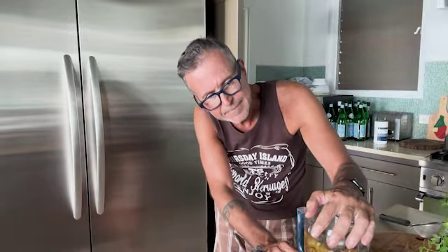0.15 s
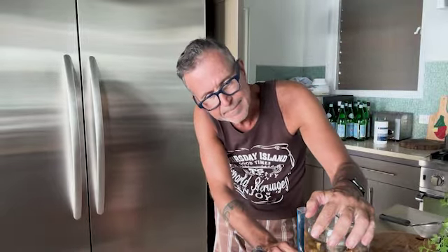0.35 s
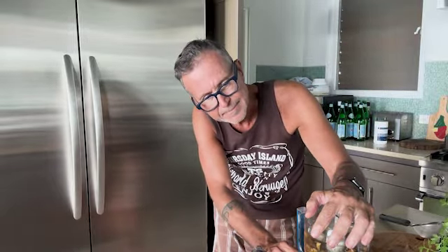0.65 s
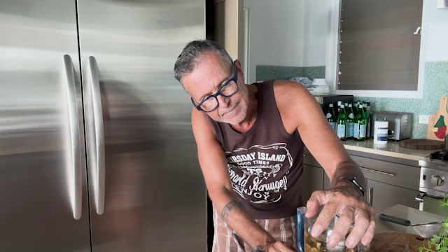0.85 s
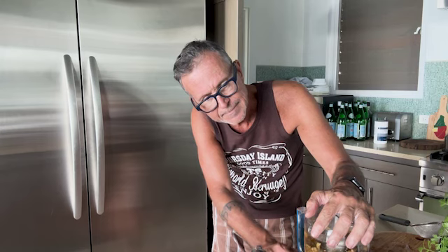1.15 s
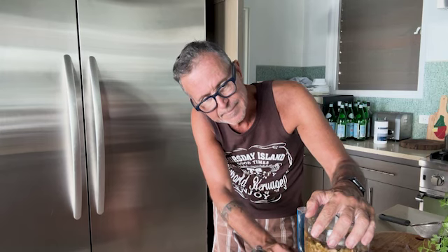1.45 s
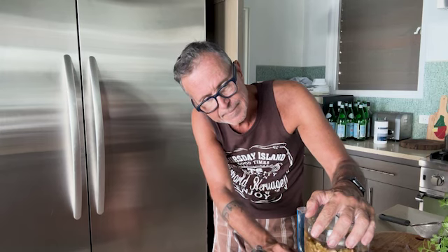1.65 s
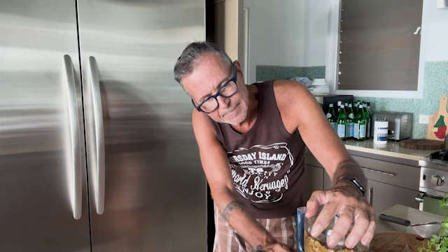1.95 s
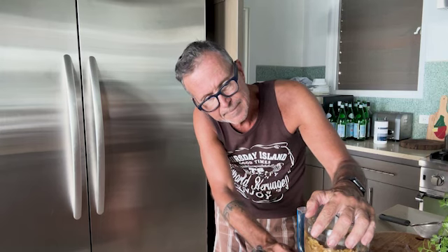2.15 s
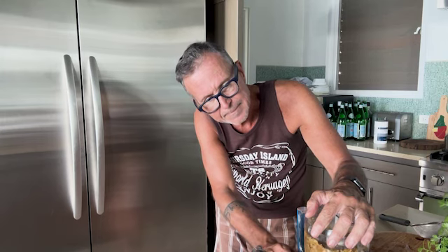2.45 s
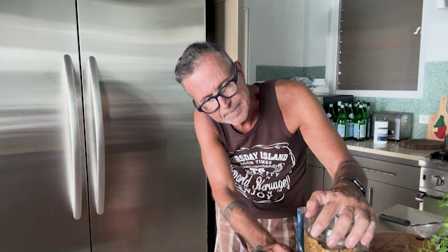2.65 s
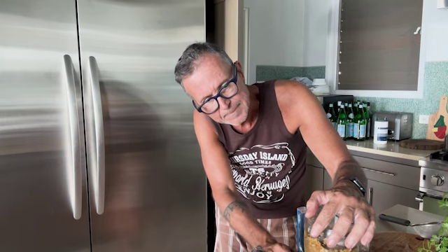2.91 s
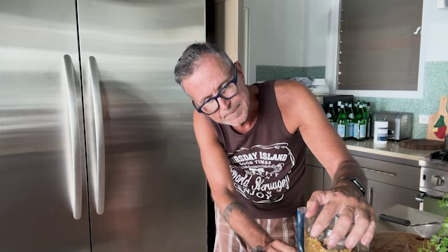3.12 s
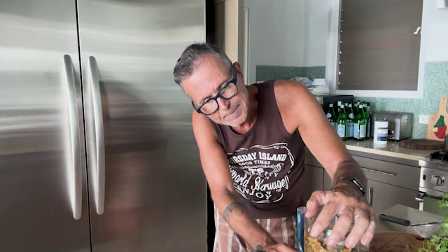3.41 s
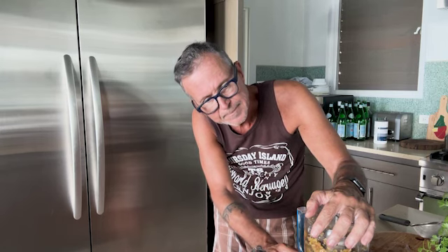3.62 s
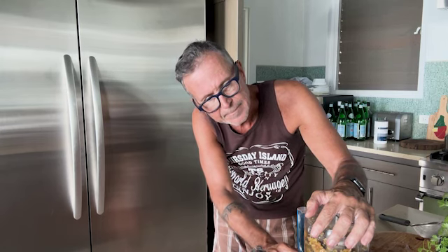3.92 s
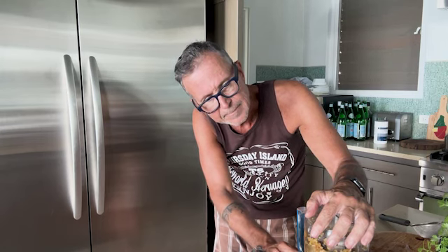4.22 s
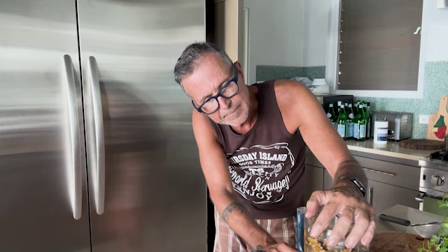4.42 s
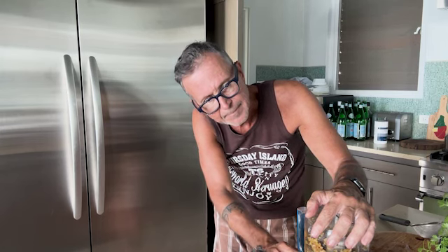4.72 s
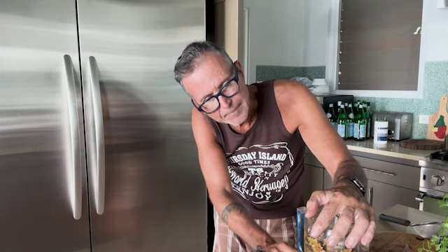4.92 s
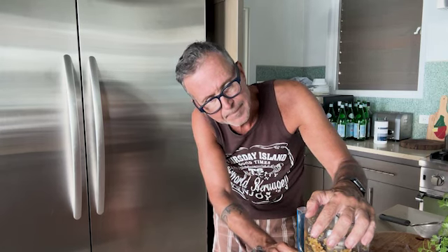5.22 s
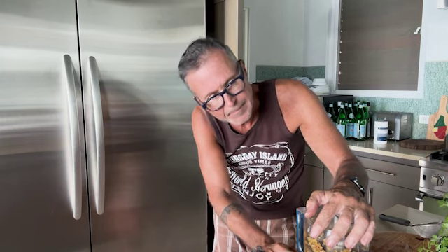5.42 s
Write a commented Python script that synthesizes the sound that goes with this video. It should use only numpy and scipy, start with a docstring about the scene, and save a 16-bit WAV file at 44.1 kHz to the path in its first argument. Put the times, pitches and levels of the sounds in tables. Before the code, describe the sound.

Short pulses of a chopper motor, an arm's length away: abrupt buzzing spin-up, gritty whine, bits of food ticking on the bowl, counter rumble on many bursts, then a quick downward slide. The bursts are crowded at first, fast and short in the middle, sparse near the end. Hard surfaces give a brief bright echo in stereo, and a refrigerator hums softly with airy hiss underneath.

```python
"""Food processor pulsed on a kitchen counter

A small food processor is pulsed in short bursts, an arm's length from a phone, with clicks of its button.
Its motor spins up under the button and coasts down. Motor speed sets the pitch of a gear whine and the
levels of noise for drive rattle, bearing squeal and counter rumble; random ticks are food on the bowl.
Shifting filtered echoes make the hard kitchen; sine hum and a hiss of air make the refrigerator.
"""
import sys
import numpy as np
from scipy import signal
from scipy.fft import rfft, irfft, next_fast_len
from scipy.io import wavfile
from scipy.ndimage import uniform_filter1d

SR = 44100
rng = np.random.default_rng(int(sys.argv[2]) if len(sys.argv) > 2 else 0)


def file_out(sig):
    """Save sig as 16-bit WAV at sys.argv[1]."""
    # one column per channel
    cols = np.atleast_2d(sig).T
    # limit, then scale
    lim = np.clip(cols, -1, 1)
    pcm = np.round(lim * 32767).astype(np.int16)
    wavfile.write(sys.argv[1], SR, pcm)


N = 245276
T = np.arange(N) / SR
SIZE = next_fast_len(N + SR)  # room for a one-second echo tail
HZ = np.fft.rfftfreq(SIZE, 1 / SR)

FULL_HZ, SPIN_UP_S = 2573, .075  # usual top mesh rate, time constant of the spin-up
KICK, KICK_HZ = 1.83, 1007.3  # extra torque near standstill, gone at this mesh rate
DRAG_HZ_PER_S, COAST_S, CRAWL_HZ = 4200, .27, 252  # friction, viscous braking; friction eases below the crawl
# Presses of the pulse button. Each row: pressed in seconds, released in seconds, mesh rate it runs toward
# in Hz, then offsets in dB over the speed law for rattle, whine, squeal, rumble, ring, upper whine partials.
PRESSES = [(-.073, 0.053, 2570, 0, 7, -1, 1.5, 6, 0.5), (0.099, 0.297, 2552, 0, 5, -1.5, 3.5, 4, -1),
           (0.351, 0.529, 2550, 0, 0.5, -1.5, 1.5, 6.5, 0), (0.63, 0.75, 2543, 0, 3, -1, 0.5, 3.5, 0.5),
           (1.155, 1.381, 2541, 1.5, 3, -1.5, 2, -14, -1), (1.673, 1.8, 2636, 0.5, 5.5, -1, 2, -30, -7),
           (2.029, 2.154, 2597, -0.5, 4, -0.5, -3, 4, 0), (2.246, 2.338, 2583, 0, 4, -1.5, 0.5, -10, -2),
           (2.471, 2.555, 2661, 0.5, 6, -1, 3.5, -4.5, -6.5),
           (2.719, 2.791, 2660, 0.5, 3, -1.5, -1, -4.5, -4), (2.947, 3.026, 2640, -0.5, 6, -1, 0.5, -7, -4),
           (4.026, 4.169, 2692, -1, 2, -3, 2, -13, -0.5),
           (4.668, 4.804, 2683, -1, 3.5, -2.5, 0.5, -12, 1.5)]


def latest_press(t):
    """Row of the press most recently begun at each time."""
    return np.maximum(np.searchsorted(np.array(PRESSES)[:, 0], t) - 1, 0)


def motor():
    """Gear mesh rate and power share: the button drives toward top speed, friction brakes; 1 ms steps."""
    step = .001
    t = np.arange(-.2, N / SR + .01, step)
    power = sum(np.clip((t - p[0]) / step, 0, 1) - np.clip((t - p[1]) / step, 0, 1) for p in PRESSES)
    top_hz = np.array(PRESSES)[latest_press(t), 2]
    speeds, speed = [], 0.
    for on, top in zip(power, top_hz):
        pull = (top - speed) / SPIN_UP_S * (1 + KICK * max(0, 1 - speed / KICK_HZ))
        brake = DRAG_HZ_PER_S * speed / (speed + CRAWL_HZ) + speed / COAST_S
        speed = max(speed + step * (on * pull - (1 - on) * brake), 0)
        speeds.append(speed)
    return np.interp(T, t, speeds), np.interp(T, t, power)


# Loudness law of the machine, before offsets. Each row: mesh rate in Hz, then levels in dB of whine,
# its 2nd partial, its 4th partial, rattle, squeal and rumble.
SPEED_LAW = [(10.1, -102, -90, -87, -80.5, -79, -76), (49.5, -75, -75, -93, -67, -65.5, -62),
             (150, -63, -60.5, -85.5, -67, -60.5, -60.5), (398, -59.5, -59, -74, -53.5, -51, -59),
             (697, -48.5, -51, -64, -42.5, -43.5, -47.5), (1043, -46, -66, -54, -36.5, -37, -49.5),
             (1185, -44.5, -49.5, -54, -36.5, -34.5, -42.5), (1474, -44, -42, -50.5, -34, -32, -43.5),
             (1856, -47, -35.5, -49, -33.5, -28, -37.5), (2080, -39.5, -40, -44, -32.5, -27, -45.5),
             (2390, -34, -37.5, -34, -32.5, -25.5, -43)]
TEETH = 10  # gear teeth that mesh per shaft turn


def processor():
    """Whine, rattle, squeal and rumble all follow one motor; returns the whine and the noisy roar apart."""
    hz, power = motor()
    power = uniform_filter1d(power, 441)
    law = np.array(SPEED_LAW)
    by_speed = [np.interp(np.log(hz + 1), np.log(law[:, 0]), column) for column in law[:, 1:].T]
    whine_db, second_db, fourth_db, rattle_db, squeal_db, rumble_db = by_speed
    offsets = uniform_filter1d(np.array(PRESSES)[latest_press(T), 3:].T, 441)  # eased over 10 ms
    rattles, whines, squeals, rumbles, rings, uppers = offsets
    # the tooth rate jitters more at high speed, blurring the whine
    jitter = (.015 + .035 * (hz / FULL_HZ) ** 2) * walk(160)
    mesh = np.cumsum(hz * (1 + jitter)) / SR
    turns = mesh / TEETH
    whine = gear_whine(mesh, turns, hz, whine_db, second_db + uppers, fourth_db + uppers)
    # the gears sing louder under power
    whine = shape(whine * undb(whines - 7.0 + 2 * power), modes(GEARBOX))
    # the drive rattles harder under power
    rattle = drive_rattle(turns) * undb(rattle_db + rattles + 0.5 * power)
    squeal = bearing_squeal(turns) * undb(squeal_db + squeals)
    return whine, rattle + squeal + counter_rumble(rumble_db, rumbles, rings)


THIRD_DB = -4.5  # third partial relative to the second
PATCHY_DB = 2.8  # the whine comes and goes
# Gearbox resonances where the whine flares. Each row: centre in Hz, width in Hz, gain in dB.
GEARBOX = [(490, 120, 8), (730, 100, 6), (970, 90, 10), (1250, 110, 10), (1600, 170, 13), (2130, 260, 8),
           (2450, 300, 5), (2900, 300, 5), (3350, 300, 6), (3720, 280, 9), (4500, 350, 11), (5550, 500, 4),
           (6800, 900, 3), (8500, 700, 6), (9450, 600, 9), (9950, 500, 7)]


def gear_whine(mesh, turns, hz, first_db, second_db, fourth_db):
    """Four trembling partials of the tooth mesh, knocked once per shaft turn."""
    whine = 0
    rough = .9 + 1.1 * (hz / FULL_HZ) ** 2
    for k, db in enumerate([first_db, second_db, second_db + THIRD_DB, fourth_db], 1):
        patchy = undb(db + PATCHY_DB * walk(40))
        whine = whine + patchy * rough_tone(k * mesh, rough, 450 * np.sqrt(k))
    return whine * knocks(turns, 0.72, 0.8)


def rough_tone(turns, rough, rate):
    """A partial whose size and phase tremble, which widens its line."""
    tremble = 1 + rough * (walk(rate) + 1j * walk(rate))
    return np.imag(tremble * np.exp(2j * np.pi * turns)) * np.sqrt(2 / (1 + 2 * rough ** 2))


def knocks(turns, depth_db, sharp):
    """Envelope with one knock of random size per shaft turn."""
    size = undb(depth_db * rng.standard_normal(N // 50))[turns.astype(int)]
    return 1 + size * sharp * np.exp(-4.0 * (turns % 1))


def ticks(rate, spread_db, decay_s):
    """Envelope of food bits that hit the bowl at random, on average rate times a second."""
    hits = (rng.random(N) < rate / SR) * undb(spread_db * rng.exponential(size=N))
    return signal.lfilter([1], [1, -np.exp(-1 / (decay_s * SR))], hits)


HOUSING_DB = -6  # how strongly the housing colours the rattle
# Housing resonances. Each row: centre in Hz, width in Hz, gain in dB.
HOUSING = [(449, 38, 2), (1038, 54, 14), (1397, 220, -36.5), (1990, 123, 14), (3580, 600, -2.5),
           (4270, 230, 12), (5730, 320, -10.5)]
# Spectrum of the drive rattle. Each row: frequency in Hz, relative density in dB per Hz.
RATTLE = [(150, -40), (250, 0), (474, -5.5), (604, -6.5), (1020, -4.5), (1300, -5.5), (1480, 0), (1760, -7),
          (3730, 0), (7500, -16.5), (9750, -26), (16500, -120)]


def drive_rattle(turns):
    """Noise knocked once a shaft turn and ticked by food, coloured by the housing; unit level."""
    shake = knocks(turns, 3.0, .8) + .4 * ticks(300, 1.8, .002)
    noise = shake * undb(0.26 * walk(24.65)) * rng.standard_normal(N)
    housing = 1 + modes(HOUSING) * undb(HOUSING_DB)
    return level(shape(noise, housing * undb(along(RATTLE))), 0)


# Spectrum of the squeal. Each row: frequency in Hz, relative density in dB per Hz.
SQUEAL = [(3820, -18), (6500, -8), (7940, -7), (9280, -1), (9660, -2), (10500, -5), (11400, -5.5),
          (12800, -7.5), (14400, -11)]
# Bearing resonance. Each row: centre in Hz, width in Hz, gain in dB.
BEARING = [(9420, 290, -7)]


def bearing_squeal(turns):
    """Treble noise gripped once a shaft turn and ticked by food, with a bearing resonance; unit level."""
    grip = knocks(turns, 2.8, 1.0) + .4 * ticks(300, 1.5, .0015)
    return level(shape(grip * rng.standard_normal(N), undb(along(SQUEAL)) * (1 + modes(BEARING))), 0)


RUMBLE_LAG_S = 0.02  # the counter takes time to shake and to settle
RING_DB = -10.0  # ring relative to the rumble, before each press's offset
# Counter resonances. Each row: centre in Hz, width in Hz, gain in dB.
COUNTER = [(137.7, 16, -1.5), (208, 47, -5), (110, 42, -7)]
# Something on the counter that rings along. Each row: centre in Hz, width in Hz, gain in dB.
RING = [(484.5, 6, 0)]


def counter_rumble(rumble_db, rumbles, rings):
    """Resonant low noise and a narrow ring, swelling and settling behind the motor speed."""
    rumble = shape(undb(0.78 * walk(22)) * rng.standard_normal(N), modes(COUNTER) ** 2)
    ring = level(shape(rng.standard_normal(N), modes(RING) ** 2), RING_DB) * undb(rings)
    keep = np.exp(-1 / (RUMBLE_LAG_S * SR))
    drive = undb(rumble_db)
    shaking = signal.lfilter([1 - keep], [1, -keep], drive, zi=[drive[0]])[0]
    return (level(rumble, 0) * undb(rumbles) + ring) * shaking


# Clicks of the pulse button. Each row: start in seconds, level at the onset in dB.
CLICKS = [(1.166, -27), (1.695, -26.5), (2.043, -24), (4.036, -30), (4.686, -30), (5.459, -41),
          (5.494, -48.5)]
# Resonances of the click. Each row: centre in Hz, width in Hz, gain in dB.
BUTTON = [(1252, 1100, 3), (2180, 1410, 4), (3899, 1333, 0.5), (8560, 5200, -10.5)]


def button():
    """Each click is a few milliseconds of crack through the plastic lid."""
    blows = np.zeros(N)
    for s, db in CLICKS:
        blows += undb(db) * (T >= s) * np.exp(-(np.maximum(T - s, 0) / 0.0035) ** 2)
    return level(shape(rng.standard_normal(N), modes(BUTTON)), 0) * blows


POSES, POSE_S = 8, .09  # echo sets that are cycled through, seconds from one to the next
# Colour of the echoes. Each row: frequency in Hz, gain in dB.
WET = [(100, -21), (200, -18.5), (350, -3.5), (550, -2.5), (1000, -3.5), (2200, 0.5), (3000, 2),
       (3700, -6.5), (4600, -1.5), (6500, -1), (9000, -11), (12000, -42), (14000, -31)]


def kitchen(x):
    """The echo pattern keeps shifting as the cook leans over the bowl, so no room tone stands still."""
    out = 0
    for k in range(POSES):
        away = np.abs((T / POSE_S - k + POSES / 2) % POSES - POSES / 2)
        fade = np.cos(np.pi / 2 * np.minimum(away, 1))
        out = out + rfft(x * fade, SIZE) * echoes_of_pose()
    return irfft(out * undb(along(WET)), SIZE)[:, :N]


EARLY_T60_S, LATE_DB = .12, 1.5  # fade of the early echoes, gain on the bands of the long tail
# Fade of the long tail. Each row: frequency in Hz, time to fall 60 dB in seconds.
ROOM_T60_S = [(100, 1), (1000, 0.86), (4000, 0.87), (12000, 0.77)]


def echoes_of_pose():
    """Early echoes off counter and tiles, then a long tail, shorter in the treble; unrelated on each side."""
    tail = decay(rng.standard_normal((2, SR)), EARLY_T60_S)
    f = np.fft.rfftfreq(SR, 1 / SR)
    for hz in 60 * 2. ** np.arange(9):  # octave bands
        band = np.clip(1 - np.abs(np.log2((f + 1) / hz)), 0, 1)
        noise = irfft(rfft(rng.standard_normal((2, SR))) * band, SR)
        tail = tail + undb(LATE_DB) * decay(noise, along(ROOM_T60_S, hz))
    return rfft(tail * (T[:SR] > .002), SIZE)


def decay(noise, t60):
    """Noise fading 60 dB in t60 s; white noise of unit level gets the energy of a single click."""
    return noise * undb(-60 * T[:SR] / t60) * np.sqrt(2 * np.log(1000) / t60 / SR)


# Compressor lines. Each row: frequency in Hz, relative level in dB.
HUM = [(59.2, -66), (91.5, -68), (118.4, -61.5), (317.6, -75), (586.8, -70.5), (640.6, -72.5)]
# Spectrum of the air. Each row: frequency in Hz, relative density in dB per Hz.
AIR = [(24, -51.5), (40, -10.5), (112, 4), (511, -11.5), (576, -11), (716, -17), (3500, -27), (8510, -46),
       (12500, -48), (16200, -82), (22000, -120)]


def refrigerator():
    """Wavering compressor lines over a soft hiss of air, alike on both sides in the bass."""
    hum = 0
    for f, db in HUM:
        waver = undb(db + 5.0 + 0.87 * walk(0.67))
        hum = hum + waver * np.sin(2 * np.pi * (f * T + rng.random()))
    mid, side = rng.standard_normal((2, N))
    colour = undb(along(AIR))
    side = shape(side, colour * np.minimum(HZ / 430.0, 1))
    air = shape(mid, colour) + side * np.array([[1], [-1]])
    return hum + level(air, -58)


def undb(db):
    """Gain of a level in dB."""
    return 10 ** (np.asarray(db) / 20)


def level(x, db):
    """Sound scaled to an rms level in dB."""
    return x * undb(db) / np.sqrt(np.mean(x ** 2))


def along(table, hz=HZ):
    """A (Hz, value) table read on a log-frequency axis."""
    f, v = np.transpose(table)
    return np.interp(np.log(hz + 1), np.log(f + 1), v)


def shape(x, response):
    """Sound filtered by a frequency response."""
    return irfft(rfft(x, SIZE) * response, SIZE)[..., :N]


def modes(table):
    """Summed response of (Hz, width, dB) resonances with alternating signs."""
    total = 0
    for k, (f, w, db) in enumerate(table):
        total = total + (-1) ** k * undb(db) * 1j * HZ * w / (f * f - HZ ** 2 + 1j * HZ * w)
    return total


def walk(rate):
    """Random levels held 1 / rate s and slewed twice; spread near 1."""
    k = int(SR / rate)
    held = np.repeat(rng.standard_normal(N // k + 1), k)
    return 1.3 * uniform_filter1d(uniform_filter1d(held, k), k)[:N]


# Phase between the phone's two ports. Each row: frequency in Hz, lead of the left port in radians.
PORT_LEAD = [(0, 0), (430, -0.6), (690, -1.3), (950, -0.9), (2760, -3.0), (3100, -2.9), (3530, -4.6),
             (4650, -3.4), (6630, -8.1), (9040, -6.4), (10900, -6.1), (13800, -4.1), (14600, -3.2),
             (15300, -3.1)]
# Balance of the two ports. Each row: frequency in Hz, left minus right in dB.
PORT_DB = [(60, -1.5), (110, -1.5), (200, -1.0), (380, -1.0), (700, -4.0), (1290, -2.0), (2380, -1.0),
           (4400, -2.0), (8120, 0.0), (15000, 0.0)]


def scene():
    """Direct sound and kitchen echoes reach the two ports of the phone, over the refrigerator."""
    whine, roar = processor()
    roar = roar + button()
    f, lead = np.transpose(PORT_LEAD)
    left = np.sqrt(undb(along(PORT_DB))) * np.exp(.5j * np.interp(HZ, f, lead))
    ports = np.array([left, 1 / left])
    direct = shape(whine + roar, ports)
    # the whine beams at the phone and stirs the room less than the roar
    echoes = shape(kitchen(undb(-4.5) * whine + roar), np.abs(ports))
    return direct + echoes + refrigerator()


def record(dry):
    """The deepest bass is thinned and the top is cut."""
    dry = signal.sosfilt(signal.butter(2, 45, "high", fs=SR, output="sos"), dry)
    return signal.sosfilt(signal.ellip(12, .2, 80, 15746, fs=SR, output="sos"), dry)


dry = scene()
out = record(dry)
file_out(out)
```